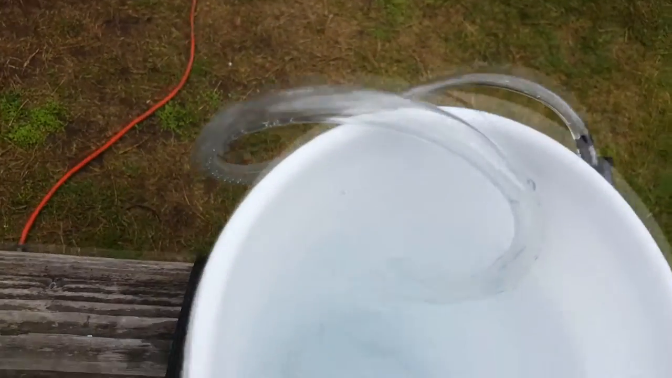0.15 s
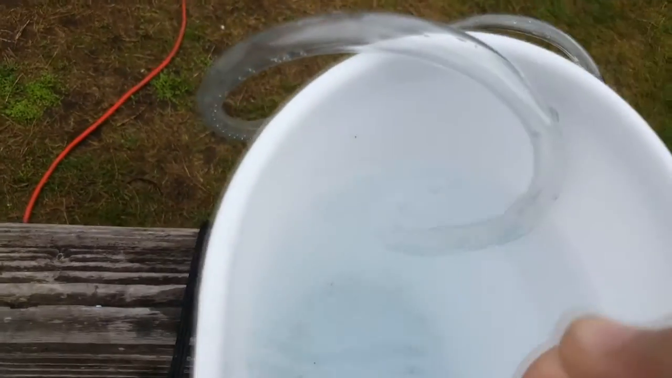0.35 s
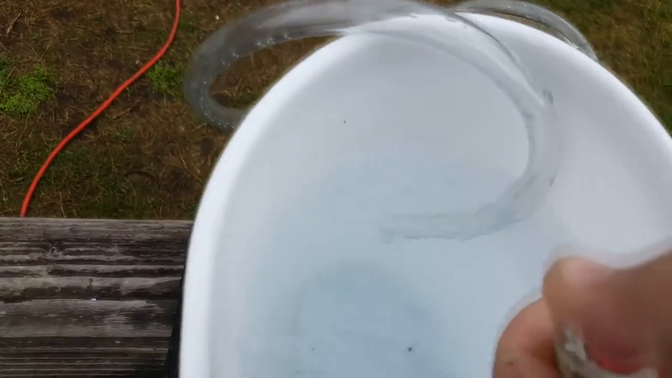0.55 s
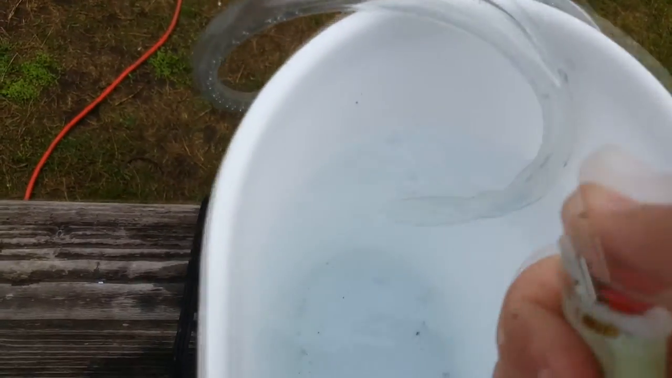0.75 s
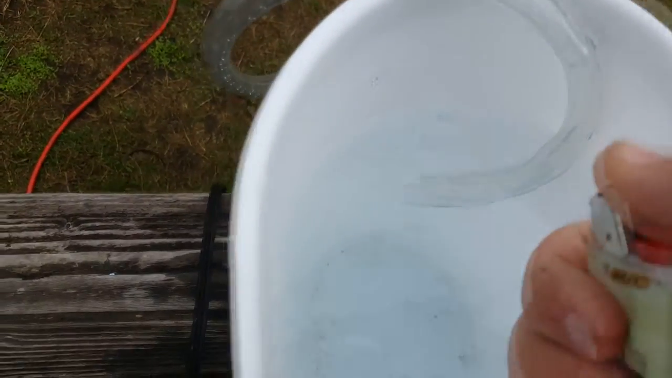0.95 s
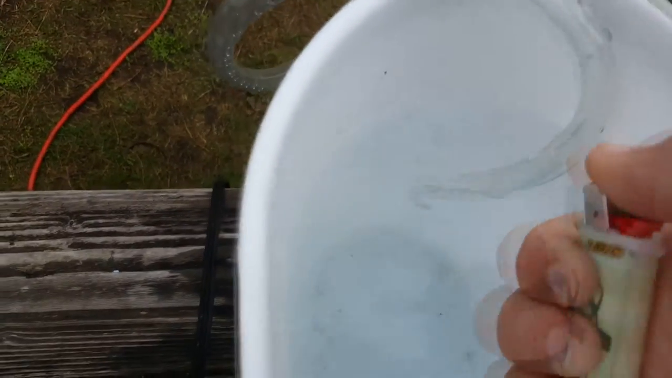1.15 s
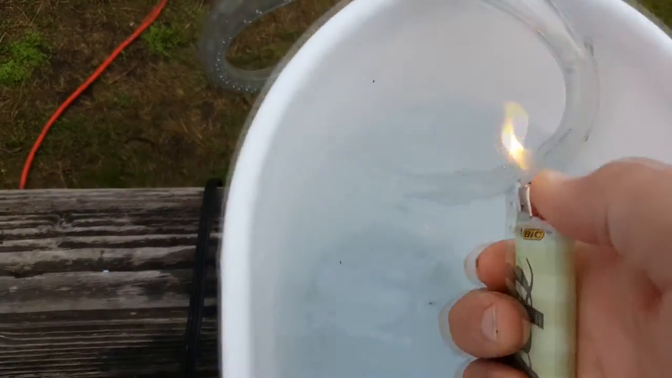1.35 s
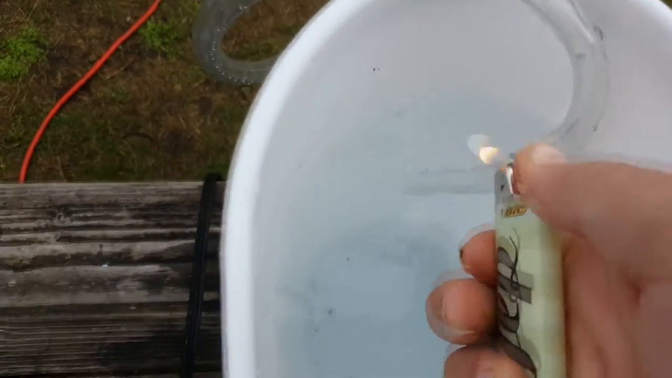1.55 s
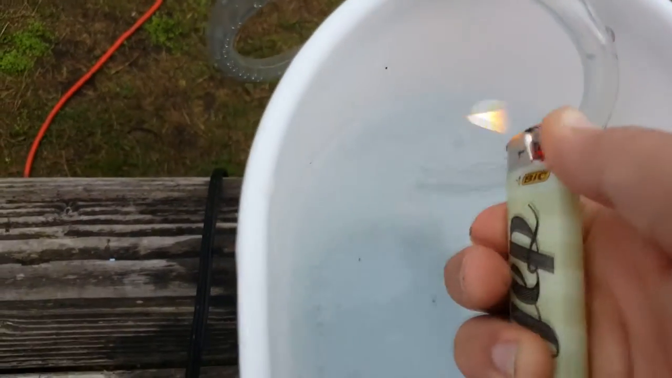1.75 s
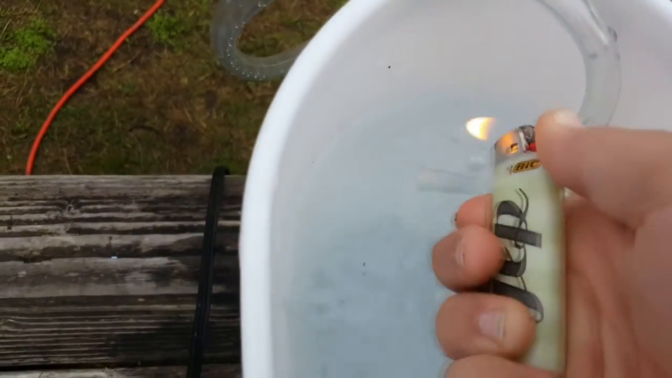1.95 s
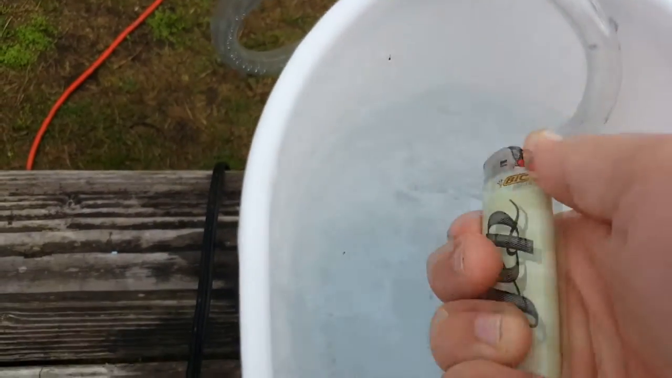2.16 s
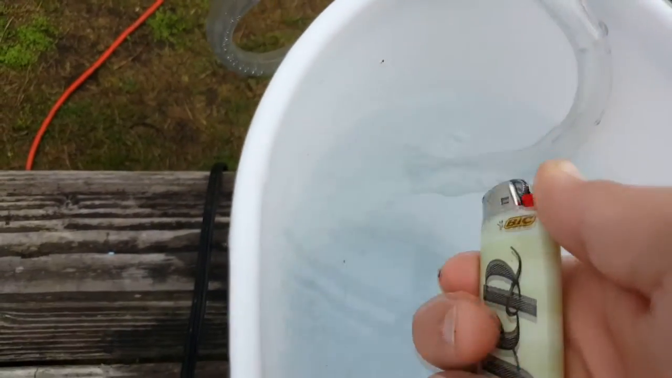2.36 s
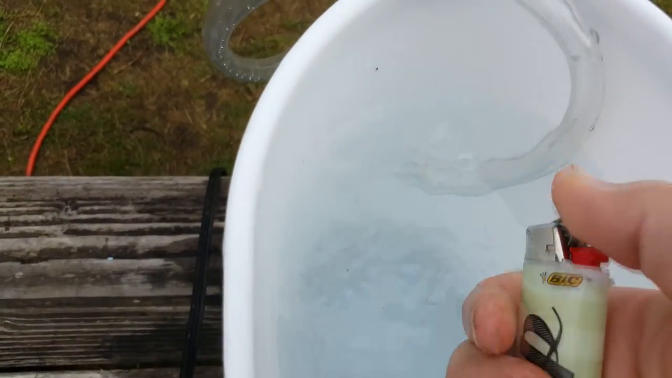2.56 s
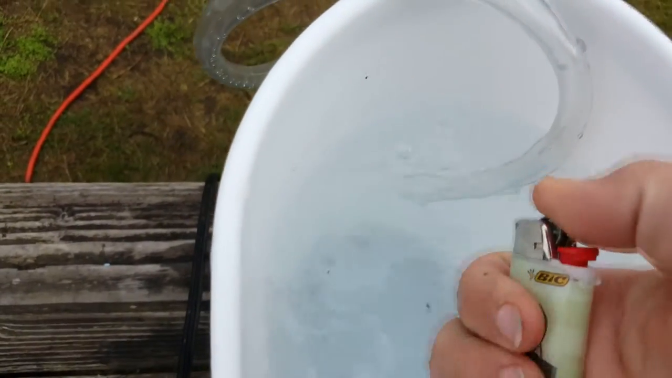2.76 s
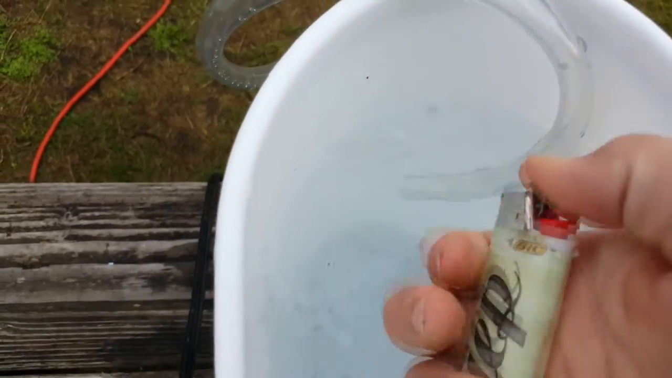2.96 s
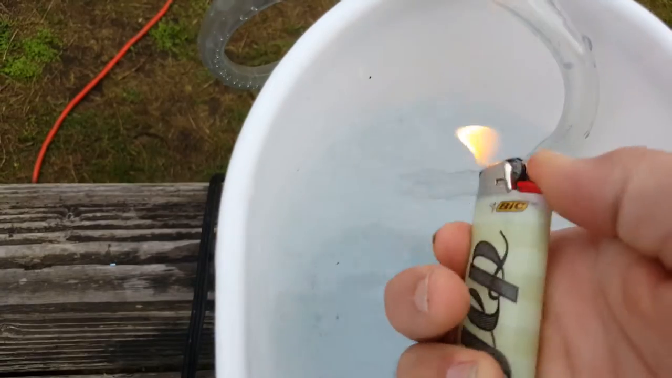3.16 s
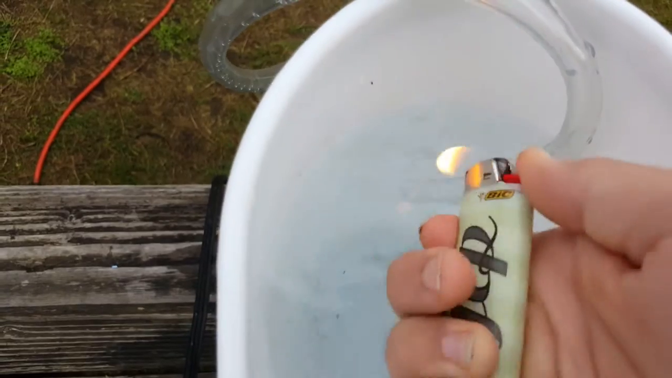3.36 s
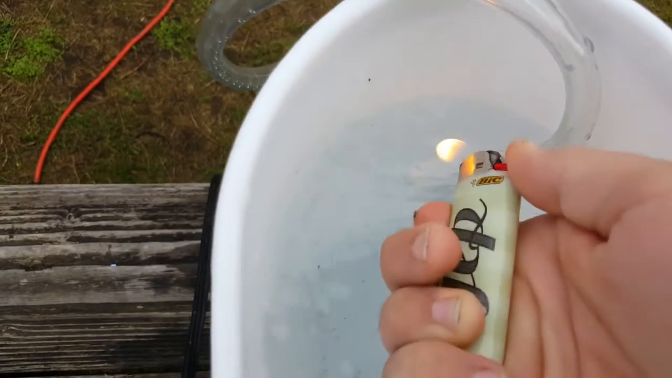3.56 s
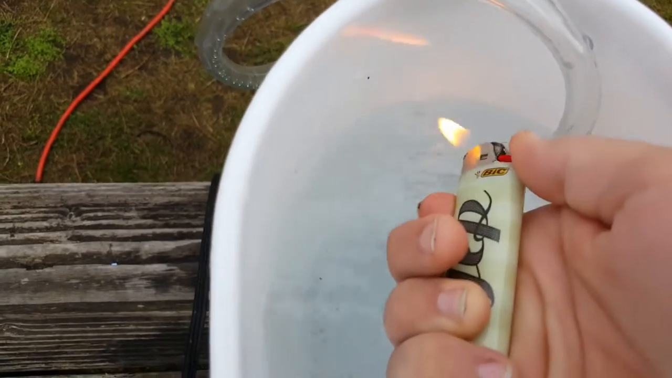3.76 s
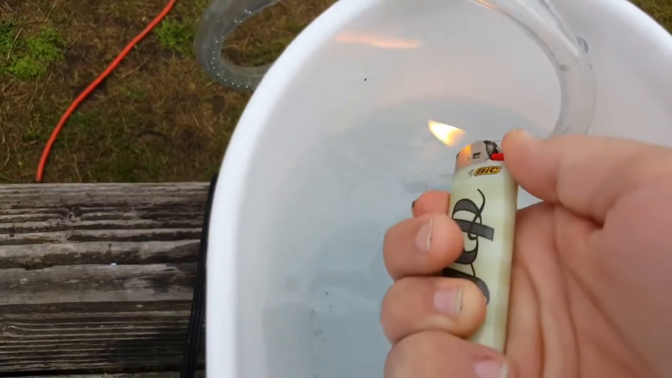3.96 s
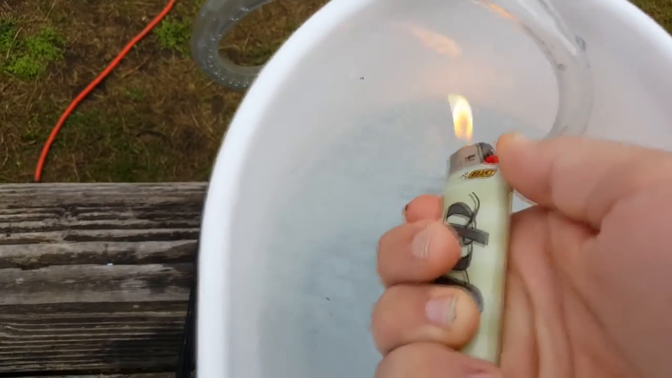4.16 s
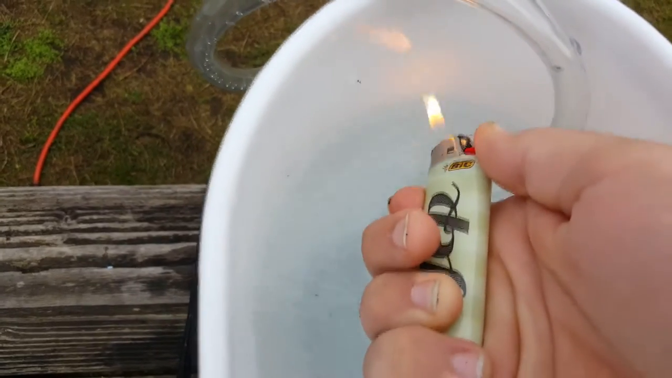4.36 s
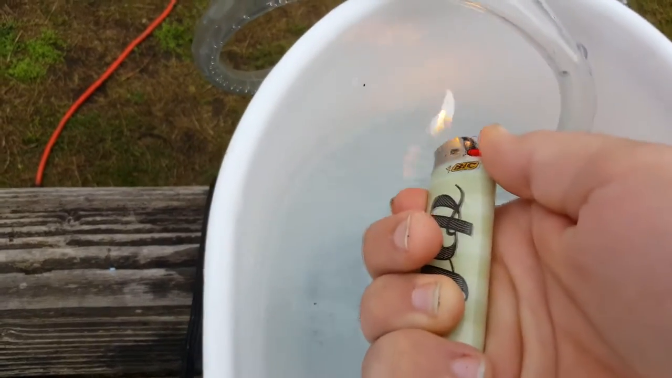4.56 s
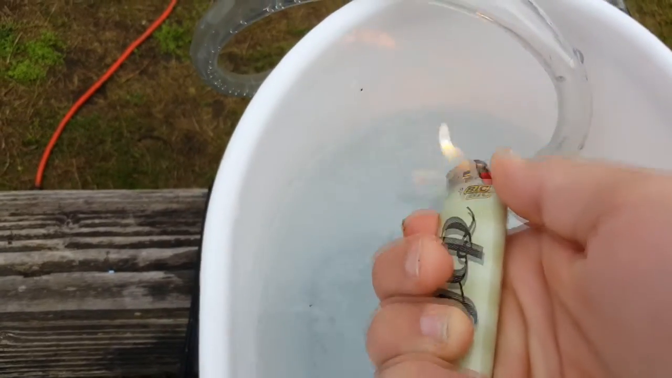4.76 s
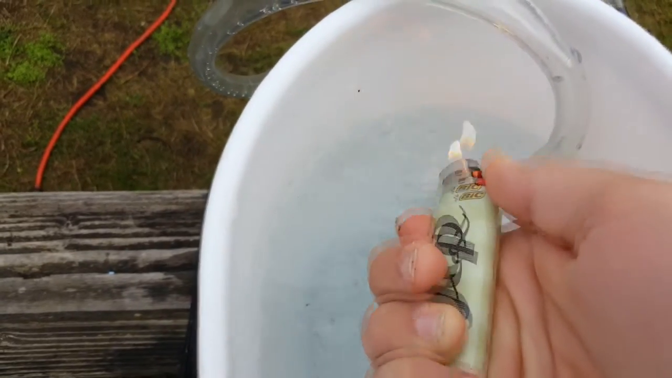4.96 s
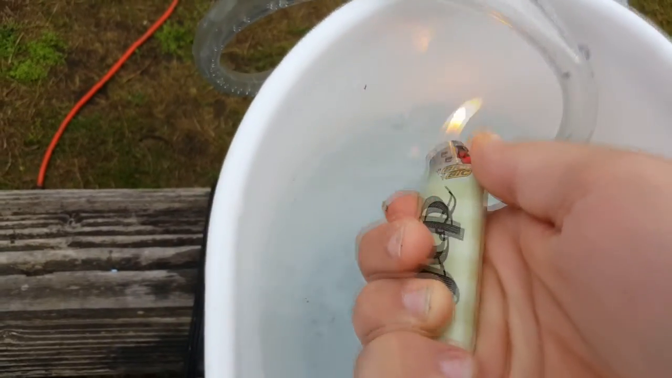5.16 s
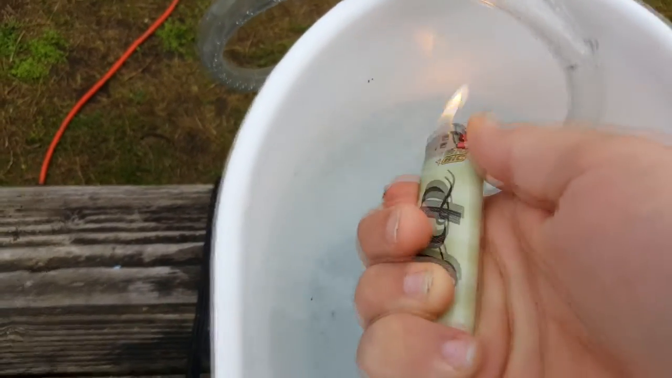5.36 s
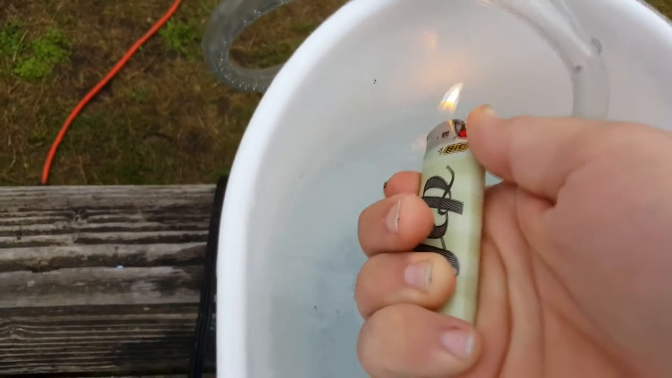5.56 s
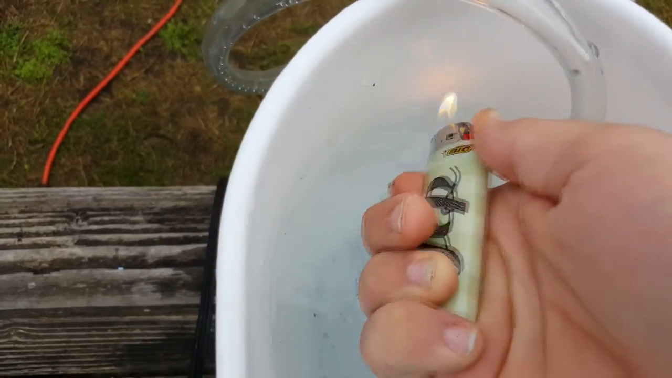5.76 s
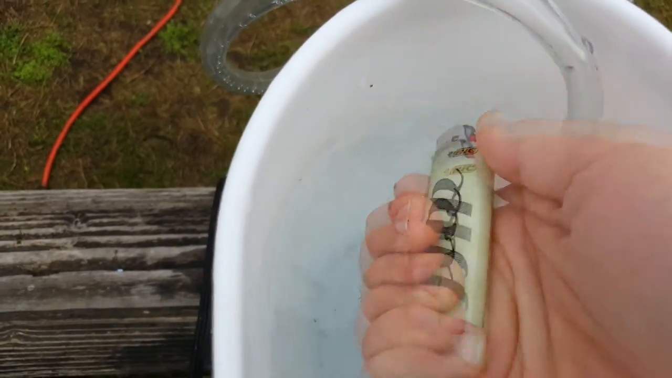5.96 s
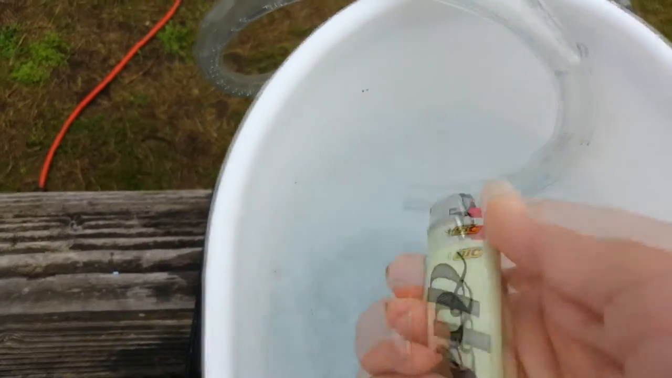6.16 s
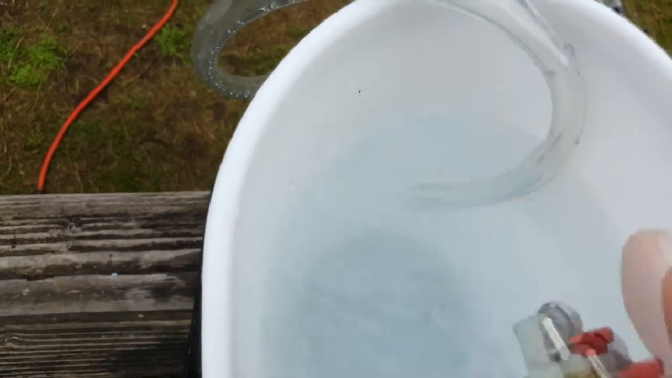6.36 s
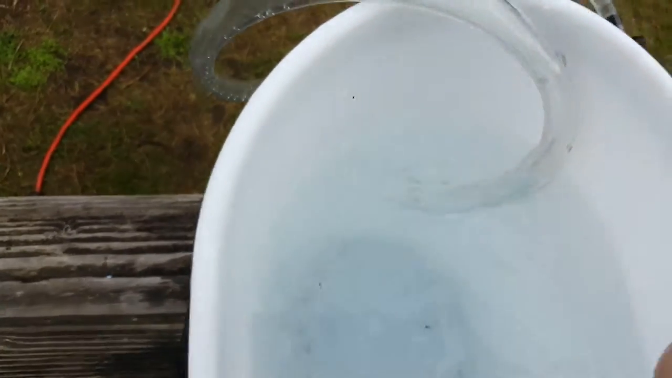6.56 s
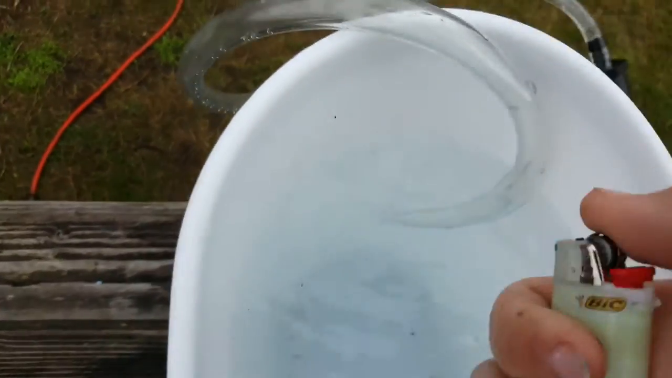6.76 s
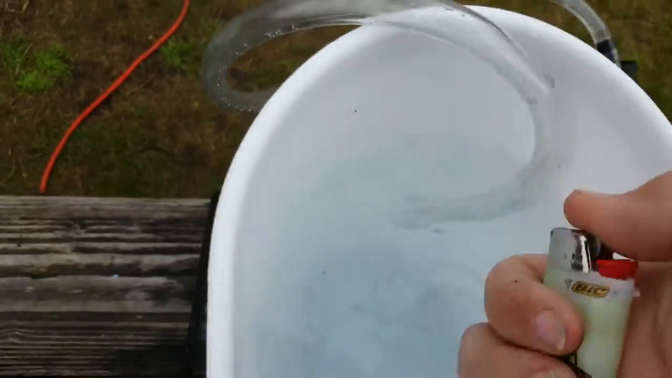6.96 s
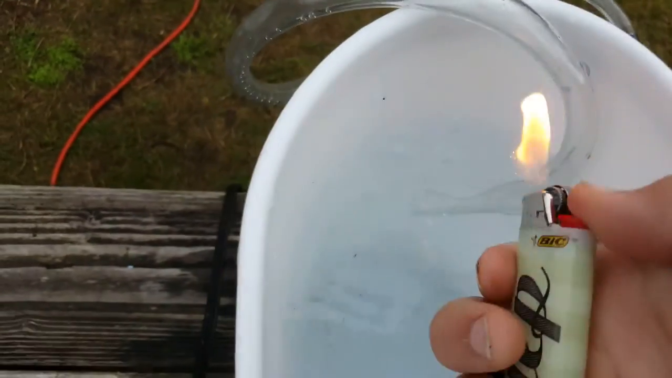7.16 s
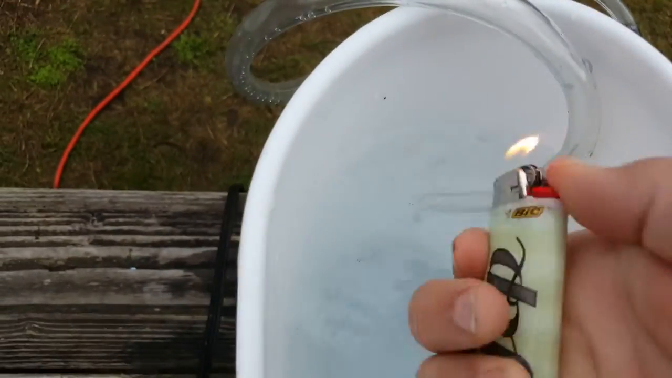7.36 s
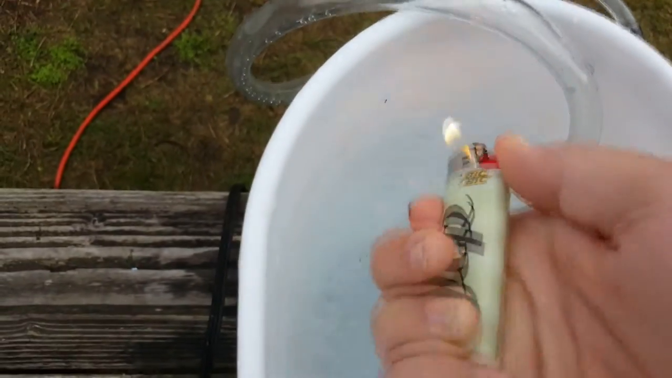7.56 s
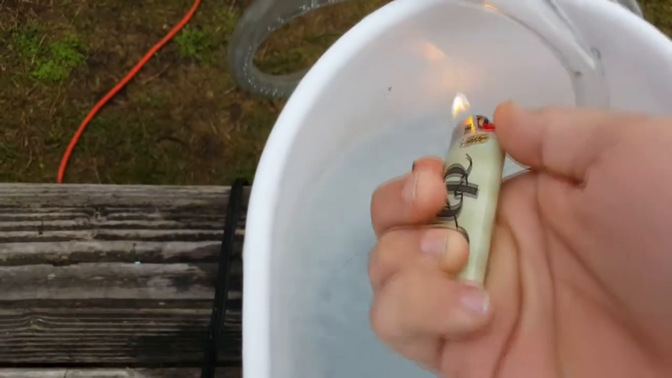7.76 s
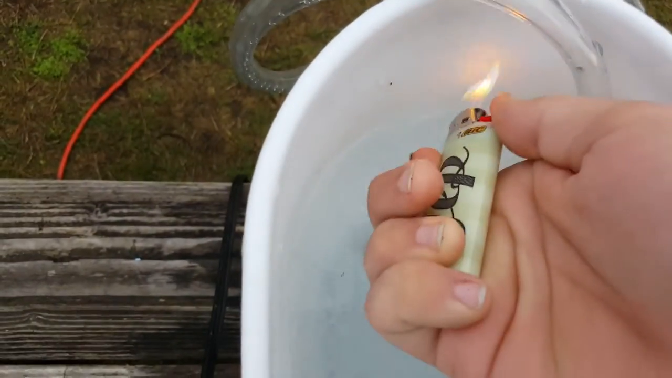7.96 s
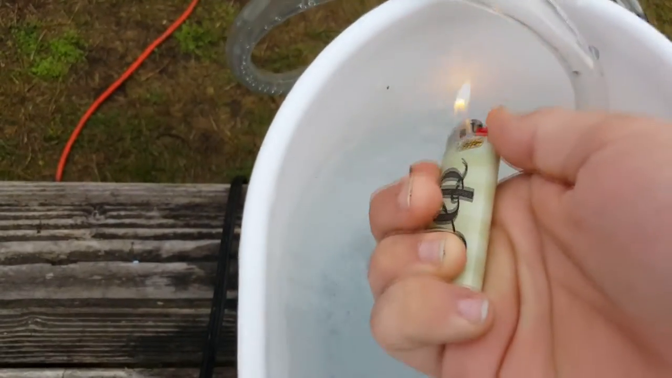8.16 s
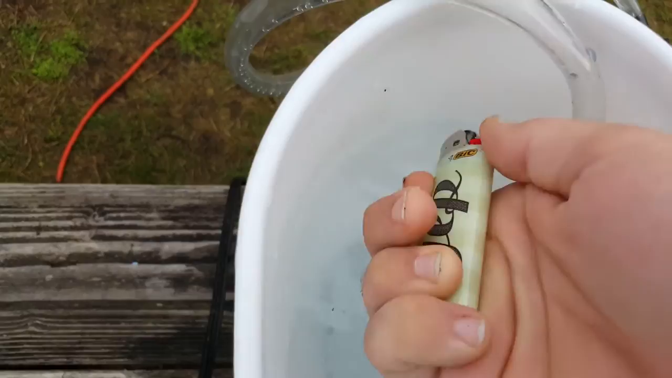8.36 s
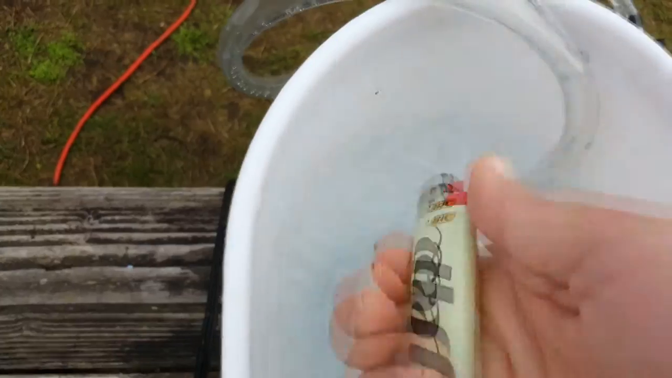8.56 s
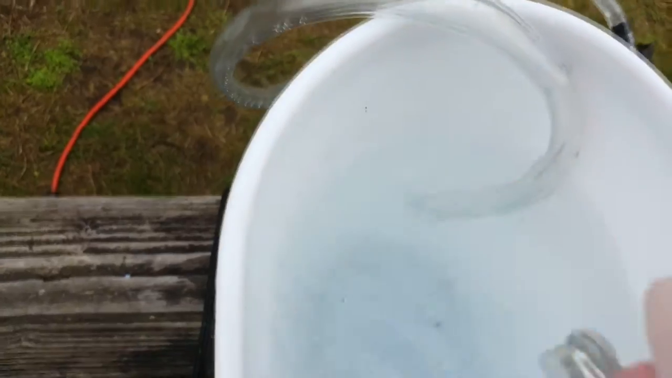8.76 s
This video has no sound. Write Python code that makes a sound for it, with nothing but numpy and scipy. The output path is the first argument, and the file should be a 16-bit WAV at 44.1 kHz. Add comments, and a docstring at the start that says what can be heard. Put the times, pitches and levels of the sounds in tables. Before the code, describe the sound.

In an open yard a gas generator hums quietly while a hose gulps about five times a second into a plastic tub. Close to the microphones a lighter rasps, clicks, and one bubble bangs hard. A second strike brings a quick double bang, then another blast; after handling noises a third strike sets off the last. Each bang overloads and briefly ducks the background.

```python
"""A gas generator hums in an open yard while its hose gulps evenly into a plastic tub of water.
Close to two microphones, a flint lighter rasps three times and a flame is held over the surface: bubbles go off
in sharp bangs, each a shock pulse ringing the air of the tub, with yard echoes about 6 to 39 m longer in path.
Small contacts are bursts of noise in one damped resonance; hum is steady tones, fan and flame coloured noise.
The bangs overload the microphones, and a gain control ducks the background for over half a second."""
import sys
import numpy as np
from scipy import signal
from scipy.fft import rfft, irfft
from scipy.io import wavfile
from scipy.ndimage import uniform_filter1d, minimum_filter1d

SR = 44100
rng = np.random.default_rng(int(sys.argv[2]) if len(sys.argv) > 2 else 0)


def master_out(mix):
    """Clip the mix to full scale and print it as 16-bit PCM to the path in sys.argv[1]."""
    frames = np.transpose(np.atleast_2d(mix))
    ceiling = np.clip(frames, -1, 1)
    pcm = np.round(ceiling * 32767).astype(np.int16)
    wavfile.write(sys.argv[1], SR, pcm)


N = 388064
TIME = np.arange(N) / SR
BRIEF = TIME[:SR // 4]   # time axis of one short event

# Levels are those of each layer before its left-right placing, gain control and overload.
# left-right likeness of steady noise: [f/Hz, correlation]
LIKENESS = [(30, 0.9), (120, 0.98), (400, 0.89), (1000, 0.11), (2500, 0.073), (8000, 0.031)]
# generator hum: [f/Hz, rms level/dB]
HUM_TONES = [(120, -59.5), (240, -63.5), (300, -72.5), (360, -52), (480, -63), (600, -79), (720, -72),
             (840, -79.5), (1080, -76), (1360, -78)]
# colour of its cooling fan and the open air: [f/Hz, relative level/dB]
FAN_COLOUR = [(25, -4), (55, -3), (110, 1), (160, -2), (250, -8), (420, -16.5), (650, -19), (1200, -18.5),
              (2000, -26), (3000, -25), (4500, -36), (8000, -37.5), (11000, -44), (15500, -38.5)]
FAN_DB = -50.5
# gas leaving the hose in the tub: peak of the first gulp, and spacing
FIRST_GULP_S, GULP_PERIOD_S = .183, .1892
# bubbles that burst unlit at the surface: [t/s, level/dB]
BURSTS = [(.7797, -46.5), (1.601, -40), (1.646, -46), (1.9929, -44.5), (3.256, -43.5), (3.458, -41.5),
          (3.5972, -40), (4.0936, -22), (4.81, -44), (5.0876, -45), (7.068, -40.5), (7.4919, -43),
          (7.6505, -46)]
# bubbles that go off with only a small plop: [t/s, level/dB, start f/Hz, end f/Hz, decay/s]
PLOPS = [(6.656, -6, 2800, 730, 0.00044)]
# fingers sliding over the housing on the left: [t/s, length/s, level/dB before halving]
SLIDES = [(0.081, .1, -31.5), (.78, 0.28, -57.5), (0.952, 0.053, -50.5), (6.467, .19, -50),
          (6.87, 0.11, -57)]
# colour of sliding skin: [f/Hz, relative level/dB]
SKIN_COLOUR = [(500, -38), (950, 5), (1600, 3), (2400, -1), (3700, -5), (5000, -21), (9000, -24.5),
               (15000, -35)]
# knocks of the hands on lighter and housing: [t/s, level/dB, centre f/Hz, left-right difference/dB]
KNOCKS = [(0.085, -24.5, 1960, 25), (0.6172, -35, 2700, 17), (1.064, -44, 2030, 4), (1.359, -19, 606, 2),
          (3.109, -26, 740, 5), (6.046, -7, 805, 10), (7.2028, -31.5, 597, -8)]
# thin ticks of the lighter's metal: [t/s, level/dB]
TICKS = [(0.6847, -33), (1.2678, -47), (2.992, -27), (5.3216, -32), (7.093, -38.5), (7.9908, -33.5)]
# lever held down after each strike: [t/s when let go, flame flutter level/dB, first gas surge level/dB,
# lever snap level/dB]
BURNS = [(2.399, -60.5, -80, -28.5), (6.0462, -55, -54.5, -1.5), (8.5756, -57, -59, -27)]
# colours of the flame's soft rush and of its thin gas jet: [f/Hz, relative level/dB]
FLUTTER_COLOUR = [(700, -16.5), (1600, -14.5), (1880, 1), (2080, 2), (2350, -9), (2700, -8.5), (3400, -18),
                  (6000, -30), (12000, -38.5)]
JET_COLOUR = [(3000, -17), (5800, -5), (7300, -5), (8600, 5), (10500, -11), (13500, -8), (15300, -2.5)]
# the flame builds up as the hood warms, while the surge of gas settles to a steady jet
WARM_S, SETTLE_S, JET_DB, SHUT_S = 0.17, .11, -73.5, .015
# lighter strikes: [t/s when the thumb lands, rasp level/dB, rasp rise/s, snap level/dB before halving,
# thumb thud level/dB, gas puff level/dB]
STRIKES = [(1.3588, -30.5, 0.015, -7.5, -33, -35.5), (3.0571, -22, 0.0045, -0.5, 2, -32),
           (7.1847, -17.5, 0.0033, -35, -55.5, -32)]
# colours of the igniting gas, the ringing wheel and the sparks: [f/Hz, relative level/dB]
PUFF_COLOUR = [(80, -5), (200, 8), (500, 8), (900, 7), (1800, -8), (3000, 10.5), (5500, -4.5), (8700, 3.5),
               (15000, -10.5)]
WHEEL_COLOUR = [(300, -8), (1000, -33), (2300, -12), (3100, -6), (3700, -3), (4500, -7.5), (5500, -27),
                (7500, -16.5), (14000, -29)]
SPARK_COLOUR = [(1500, 1.5), (4000, 0.5), (6000, 0), (8800, 13), (12000, 5.5), (15500, -7)]
# reflections from deck, fence and house, over the scatter: [delay t/s, spread/s, level/dB]
ECHOES = [(.0185, 0.0018, -7.5), (.0285, .003, 8.5), (.064, .005, -0.5), (.115, .008, -4)]
# colour of the yard's echo: [f/Hz, relative level/dB]
YARD_COLOUR = [(100, -18.5), (250, -10.5), (550, -7.5), (1200, 2), (2000, 1.5), (4000, -7.5), (9000, -7),
               (15000, 6)]
# late decay of the yard: [f/Hz, time to fall 60 dB/s]
YARD_T60 = [(100, .4), (600, .48), (1200, .7), (2000, .72), (4000, .66), (8000, .55), (11000, .42),
            (15000, .27)]
# exploding bubbles: [t/s, blast level/dB, brightness f/Hz, relative thump level/dB, ring length factor,
# pitch factor, relative yard echo level/dB, share kept per wall bounce]
POPS = [(2.087, 22, 6487, 6.5, 1.01, 1.008, -17.5, 0.5), (3.942, 11, 992, -8.5, 0.77, 1.02, -21.5, .5),
        (3.9743, 11.5, 3375, -6, 0.9, 0.98, -9.5, 0.39), (5.8958, 21, 6140, -1.5, 0.83, 1.01, -12, 0.28),
        (8.3191, 24, 5000, -14, 0.65, 0.98, -16, 0.41)]
# air in the tub, before the bubble's length and pitch factors and random level:
# [f/Hz, level/dB, time to fall 60 dB/s, phase lag at the right microphone/rad]
TUB_MODES = [(475, -13.5, 0.016, 0.18), (616, -12, 0.028, 0.39), (873, -16, 0.027, 0.19),
             (1183, -5, 0.029, 0.081), (1550, -4, 0.017, 2.5), (1927, -2.5, 0.028, 1.2),
             (2505, -2.5, 0.017, 0.9), (2840, -3, 0.008, 3.7), (3330, -4, 0.022, 2.4),
             (3600, -10.5, 0.018, 0.56), (4359, -2, 0.019, 2.3), (5270, -14, .02, 2.3),
             (7970, -8, 0.045, 2.9)]
# water and tub wall heaving under a blast: [f/Hz, level/dB, time to fall 60 dB/s]
HEAVE = [(101, -25, 0.053), (244, -15, 0.025), (302, -14.5, 0.022)]
BOUNCE_S = .00153   # time for a shock to cross the tub
CUTOFF_HZ = 16000   # nothing is passed above this


def from_db(db):
    """Decibels to gain."""
    return 10 ** (np.asarray(db) / 20)


def rms_one(x):
    """Scale to unit rms."""
    return x / np.sqrt(np.mean(x ** 2) + 1e-20)


def at_hz(points, hz):
    """Read a (Hz, value) table on a log-frequency axis."""
    f, value = np.transpose(points)
    return np.interp(np.log(np.maximum(hz, 1)), np.log(f), value)


def pan(db):
    """Left and right gains; a positive difference leans left."""
    return from_db(np.array([[db], [-db]]) / 2)


def dying(t, t60):
    """Exponential decay by 60 dB in t60."""
    return from_db(-60 * t / t60)


def add(out, s, sound):
    """Mix a sound into out, starting at time s."""
    at = round(s * SR)
    out[:, at:at + sound.shape[-1]] += sound[..., :out.shape[1] - at]


def noise(spectrum, size=N):
    """Stereo noise of a given colour, most alike at both microphones in the bass; rms 1."""
    hz = np.arange(size // 2 + 1) * SR / size
    alike = np.clip(at_hz(LIKENESS, hz), -1, 1)
    mid, side = rfft(rng.standard_normal((2, size)))
    pair = np.sqrt(1 + alike) * mid + np.sqrt(1 - alike) * side * [[1], [-1]]
    return rms_one(irfft(pair * from_db(at_hz(spectrum, hz)), size))


def click(hz, width_hz, decay_s):
    """A tiny noise burst ringing in one broad resonance; peak 1."""
    low = np.sqrt(hz ** 2 + width_hz ** 2 / 4) - width_hz / 2   # hz is the geometric centre of the band
    high = min(low + width_hz, SR / 2 - 1000)
    band = signal.butter(2, [low, high], "band", fs=SR, output="sos")
    burst = rng.standard_normal((2, len(BRIEF))) * (np.exp(-BRIEF / decay_s) + 1e-12)
    tick = signal.sosfilt(band, burst)
    return tick / np.abs(tick).max()


def generator(hum_left_db=3.0, fan_left_db=2.5):
    """Across the yard's background, steady hum tones lie over the noise of a fan."""
    hum = np.zeros(N)
    for hz, db in HUM_TONES:
        hum += from_db(db) * np.sqrt(2) * np.sin(2 * np.pi * (hz * TIME + rng.random()))
    fan = from_db(FAN_DB) * noise(FAN_COLOUR)
    return hum * pan(hum_left_db) + fan * pan(fan_left_db)


def gulps(db=-45, hz=490, swell_s=0.0019, vary_db=1.5):
    """Gas leaves the hose in soft, evenly paced gulps; the louder ones ring lower."""
    out, t = np.zeros((2, N)), BRIEF
    swell = t / swell_s * np.exp(1 - t / swell_s)
    for s in np.arange(FIRST_GULP_S, N / SR, GULP_PERIOD_S):
        size = rng.standard_normal()
        ring = np.sin(2 * np.pi * hz * (1 - .03 * size) * t)
        add(out, s - swell_s, from_db(db + vary_db * size) * swell * ring)
    return out


def bursts(hz=6100, width_hz=2600, decay_s=0.0016, left_db=5,
           faint_db=-54, faint_vary_db=1.0, faint_octaves=.3, faint_count=12):
    """Unlit bubbles burst with a small tick; fainter ones of varied level and pitch come at random."""
    out = np.zeros((2, N))
    for s, db in BURSTS:
        add(out, s, from_db(db) * click(hz, width_hz, decay_s))
    for when, size, pitch in rng.uniform(-1, 1, (faint_count, 3)):
        faint = click(hz * 2 ** (faint_octaves * pitch), width_hz, decay_s)
        add(out, abs(when) * TIME[-1], from_db(faint_db + faint_vary_db * size) * faint)
    return out * pan(left_db)


def plop(fall_s=0.00062, slap_db=-9.0, slap_hz=448, slap_width_hz=600, slap_s=0.0015, slap_left_db=-6):
    """A short ring whose pitch drops as the bubble opens, with a dull slap of water."""
    out, t = np.zeros((2, N)), BRIEF
    for s, db, start_hz, end_hz, decay_s in PLOPS:
        hz = end_hz + (start_hz - end_hz) * np.exp(-t / fall_s)
        swell = np.exp(-t / decay_s) * (1 - np.exp(-t / fall_s))
        ring = swell * np.sin(2 * np.pi * np.cumsum(hz) / SR)
        slap = from_db(slap_db) * pan(slap_left_db) * click(slap_hz, slap_width_hz, slap_s)
        add(out, s, from_db(db) * (ring + slap))
    return out


def brush(skew=0.51, left_db=14):
    """Skin slides on the housing: each stroke swells quickly and trails off."""
    level = np.zeros(N)
    for s, length_s, db in SLIDES:
        progress = np.clip((TIME - s) / length_s, 0, 1)
        level += from_db(db) * np.sin(np.pi * progress ** skew) ** 2
    return level * noise(SKIN_COLOUR) * pan(left_db) / 2


def knocks(relative_width=1.17, ring_cycles=1.07):
    """Heavily damped contacts: the lower a knock, the longer it lasts."""
    out = np.zeros((2, N))
    for s, db, hz, left_db in KNOCKS:
        add(out, s, from_db(db) * pan(left_db) * click(hz, relative_width * hz, ring_cycles / hz))
    return out


def ticks(hz=9400, width_hz=5200, decay_s=.0016, left_db=8):
    """The wheel and hood of the lighter give thin, bright ticks."""
    out = np.zeros((2, N))
    for s, db in TICKS:
        add(out, s, from_db(db) * click(hz, width_hz, decay_s))
    return out * pan(left_db)


def lever(hz=3200, width_hz=6500, decay_s=0.00099, left_db=-2.5):
    """The gas lever springs back when the thumb lets go."""
    out = np.zeros((2, N))
    for s, _, _, db in BURNS:
        add(out, s, from_db(db) * click(hz, width_hz, decay_s))
    return out * pan(left_db)


def flame(left_db=2.5):
    """From each strike until the lever is let go, the flame rushes softly with a thin jet of gas."""
    flutter, jet = np.zeros(N), np.zeros(N)
    for (lit_s, *_), (off_s, flutter_db, surge_db, _) in zip(STRIKES, BURNS):
        age = np.maximum(TIME - lit_s, 0)
        valve = (age > 0) * np.exp(-np.maximum(TIME - off_s, 0) / SHUT_S)
        flutter += valve * from_db(flutter_db) * (1 - np.exp(-age / WARM_S)) ** 4
        jet += valve * (from_db(JET_DB) + from_db(surge_db) * np.exp(-age / SETTLE_S))
    return (flutter * noise(FLUTTER_COLOUR) + jet * noise(JET_COLOUR)) * pan(left_db)


def lighter(lead_s=0.08, grit_db=2.5, wheel_db=-6, slow_db=-7, slow_rise_s=0.025, stop_s=0.0019,
            puff_s=0.024, snap_s=0.00031, thud_hz=170, thud_t60=0.0035, left_db=8):
    """The wheel grinds the flint ever faster and throws sparks, the thumb lands, and the gas catches."""
    out, t = np.zeros((2, N)), BRIEF - lead_s   # the thumb lands at t = 0
    before, after, landed = np.minimum(t, 0), np.maximum(t, 0), t >= 0
    for s, db, rise_s, snap_db, thud_db, puff_db in STRIKES:
        # teeth catch unevenly
        roughness = rms_one(uniform_filter1d(rng.standard_normal(len(t)), size=70))
        grit = from_db(grit_db * roughness)
        speed = np.exp(before / rise_s)
        turning = speed + from_db(slow_db) * np.exp(before / slow_rise_s)
        wheel = from_db(wheel_db) * turning * noise(WHEEL_COLOUR, size=len(t))
        sparks = speed * noise(SPARK_COLOUR, size=len(t))
        rasp = from_db(db) * np.exp(-after / stop_s) * (wheel + sparks)
        puff = from_db(puff_db) * landed * np.exp(-after / puff_s) * noise(PUFF_COLOUR, size=len(t))
        snap = from_db(snap_db) / 2 * landed * np.exp(-after / snap_s) * rng.standard_normal(len(t))
        thud = from_db(thud_db) * np.sin(2 * np.pi * thud_hz * after) * dying(after, thud_t60)
        add(out, s - lead_s, grit * (rasp + puff) + snap + thud)
    return out * pan(left_db)


def yard(early_t60=0.23, late_db=-18, first_s=0.024):
    """Outdoor response: a few reflections, scatter that dies fast, a faint long tail from trees and houses."""
    t = TIME[:SR]
    clusters = 1 + sum(from_db(db) * np.exp(-((t - s) / spread) ** 2) for s, spread, db in ECHOES)
    scatter = noise(YARD_COLOUR, size=SR)
    early = scatter * clusters * dying(t, early_t60)
    # in the late tail each band fades at its own rate
    hz, when, cells = signal.stft(scatter, SR, nperseg=256)
    fade = dying(when, np.maximum(at_hz(YARD_T60, hz), .05)[:, None])
    late = signal.istft(cells * fade, SR)[1][:, :SR]
    out = early + from_db(late_db) * late
    out = out * (1 - np.exp(-(t / first_s) ** 2))   # little returns before the nearest surfaces
    return rms_one(out) / np.sqrt(SR)


def shock(t, s):
    """Blast pulse: overpressure, then suction."""
    return (1 - t / s) * np.exp(-t / s)


def pops(crack_db=-5, crack_t60=0.029, burn_s=0.00075, shock_s=0.00037, shock_db=-3, open_db=26,
         open_s=.0001, bounce_count=9, vary_db=4.0, left_db=1.0):
    """Each blast is a shock pulse that rattles round the tub, rings its modes and heaves the water."""
    out, t, response = np.zeros((2, N)), BRIEF, yard()
    for s, db, bright_hz, thump_db, length, pitch, echo_db, kept in POPS:
        build_up = 1 - np.exp(-(t / burn_s) ** 2)
        rattle = rng.standard_normal((2, len(t))) * dying(t, crack_t60 * length) * build_up
        blast = from_db(shock_db) * shock(t, shock_s) + from_db(crack_db) * rattle
        for hz, mode_db, t60, lag in TUB_MODES:
            phase = 2 * np.pi * hz * pitch * t - np.array([[0], [lag]])
            mode_gain = from_db(mode_db + vary_db * rng.standard_normal())
            blast += mode_gain * np.sin(phase) * dying(t, t60 * length)
        # a slower burn gives a duller bang
        corners = [min(hz, SR / 3) for hz in (bright_hz, 2 * bright_hz)]
        dull = np.vstack([signal.butter(1, hz, fs=SR, output="sos") for hz in corners])
        heave = np.zeros(len(t))
        for hz, heave_db, t60 in HEAVE:
            heave += from_db(thump_db + heave_db) * np.sin(2 * np.pi * hz * t) * dying(t, t60)
        add(out, s, from_db(db) * (signal.sosfilt(dull, blast) + heave))
        # the shock spills over the rim at each wall bounce, so the yard echoes in even bands
        pulse = from_db(open_db) * signal.sosfilt(dull, shock(t, open_s))
        spill = np.zeros((2, len(t)))
        for k in range(bounce_count):
            add(spill, k * BOUNCE_S, pulse)
            blunted = uniform_filter1d(pulse, size=5, mode="constant")
            pulse = np.clip(kept, 0, .8) * blunted
        add(out, s, from_db(db + echo_db) * signal.fftconvolve(spill, response, axes=1))
    return out * pan(left_db)


def scene():
    """Everything as it reaches the two microphones."""
    hands = brush() + knocks() + ticks() + lever() + lighter()
    water = gulps() + bursts() + plop() + pops()
    return generator() + flame() + hands + water


def smooth(v, s):
    """Causal one-pole smoothing with time constant s."""
    keep = np.exp(-1 / (s * SR))
    return signal.lfilter([1 - keep], [1, -keep], v)


def gain_control(x, threshold_db=-9, most_db=17.5, attack_s=0.011, hold_s=0.55, release_s=0.3):
    """Loud sound quickly turns the gain down; it stays down for a while, then creeps back."""
    level_db = 10 * np.log10(smooth(np.mean(x ** 2, axis=0), attack_s) + 1e-12)
    cut_db = np.clip(level_db - threshold_db, 1e-6, most_db)
    # largest cut within the past hold time
    half = int(hold_s * SR / 2)
    held = -minimum_filter1d(-cut_db, 2 * half + 1, origin=half, mode="nearest")
    # the cut in dB then dies away exponentially
    released = np.exp(np.maximum.accumulate(np.log(held) + TIME / release_s) - TIME / release_s)
    return x * from_db(-smooth(released, attack_s))


def record(dry, low_cut_hz=55):
    """Gain control, hard overload on the bangs, a bass roll-off, and the top cut off."""
    clipped = np.clip(gain_control(dry), -.88, .88)
    low_cut = signal.butter(2, low_cut_hz, "high", fs=SR, output="sos")
    thinned = signal.sosfilt(low_cut, clipped)
    top_cut = signal.ellip(12, .1, 100, CUTOFF_HZ, fs=SR, output="sos")
    return signal.sosfilt(top_cut, thinned)


dry = scene()
out = record(dry)
master_out(out)
```